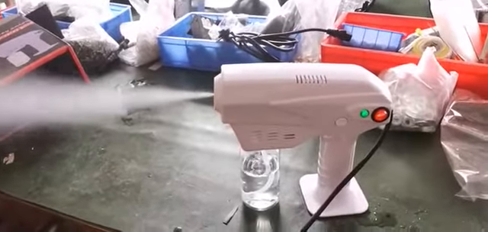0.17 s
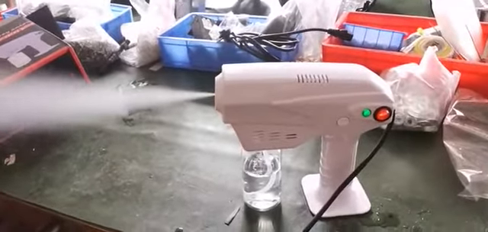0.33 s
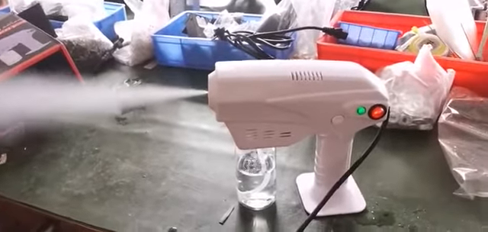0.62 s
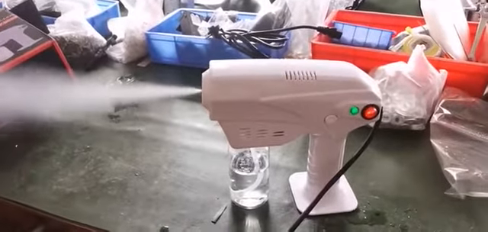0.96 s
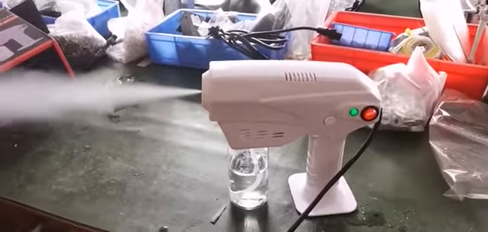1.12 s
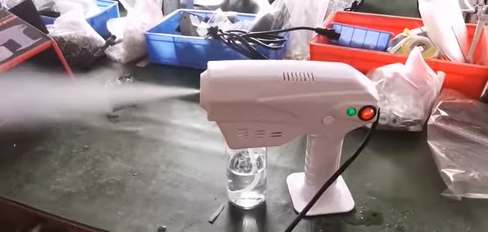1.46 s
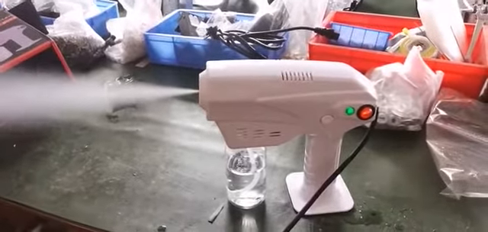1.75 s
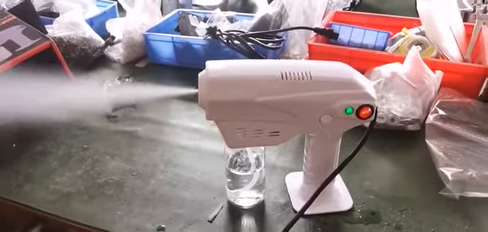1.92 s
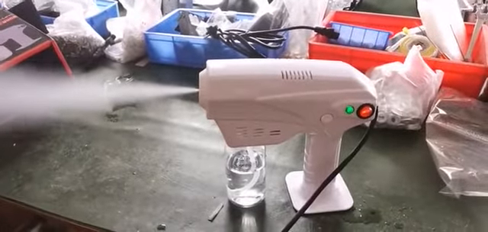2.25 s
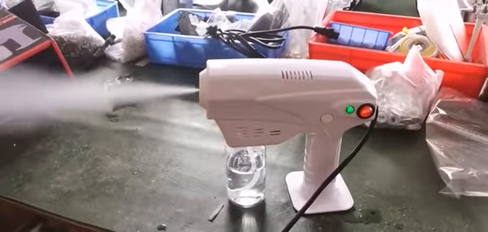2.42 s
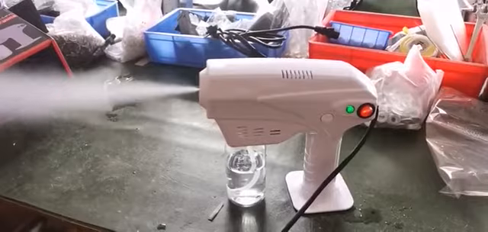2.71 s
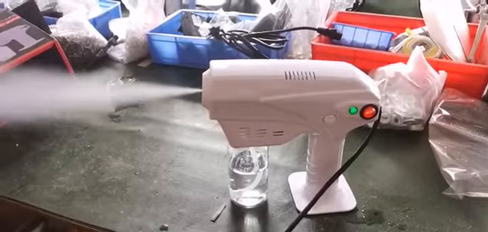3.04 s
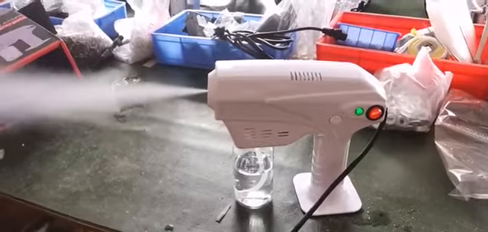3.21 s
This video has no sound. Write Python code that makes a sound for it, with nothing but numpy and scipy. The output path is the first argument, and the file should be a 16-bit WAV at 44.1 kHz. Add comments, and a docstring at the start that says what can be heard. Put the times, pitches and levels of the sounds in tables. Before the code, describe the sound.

A handheld fogger blows a continuous bright, airy hiss for about 3.4 seconds, fluttering rapidly with small spurts and spitting droplets, slightly hollow from close reflections. Behind it, a load drags across the floor around 0.2-0.7 and 0.75-1.4 seconds, scraping, faintly ringing like metal and rumbling. A small low bump comes near 2 seconds, then dull thuds from 2.6 to the end. Faint room hum; single microphone, dulled extreme top.

```python
"""A steam fogger on a work table blows a jet of mist: a bright, fluttering noise hiss with spurts and spat
droplets as water flashes in the nozzle, combed by close reflections off table and housing.
Behind it something is dragged twice across the shop floor: rubbing noise makes the scrape and excites
a thin metal ring, and resonant noise makes the rumble. Dull thuds of low noise follow, and the room
hums faintly as wavering dull noise. One microphone."""
import sys
import numpy as np
from scipy import signal
from scipy.fft import rfft, irfft
from scipy.io import wavfile
from scipy.ndimage import uniform_filter1d

SR = 44100
rng = np.random.default_rng(int(sys.argv[2]) if len(sys.argv) > 2 else 0)


def persist_wave(psi):
    """Save psi, clipped to +-1, as 16-bit WAV."""
    counts = np.round(np.clip(psi, -1, 1) * 32767).astype(np.int16)
    wavfile.write(sys.argv[1], SR, np.atleast_2d(counts).T)


def volts(x):
    """Linear amplitude factor 10**(x/20) for a level x in dB, scalar or array-like."""
    e = np.asarray(x, float) / 20
    return 10 ** e


N = 148617

# Tone colour of the steam jet: (frequency [Hz], relative density [dB per Hz])
JET_COLOUR = [(400, -41.5), (700, -19.5), (1100, -20), (1500, -18.5), (2100, -14), (2800, -9), (3500, -14),
              (4000, -12), (4250, -4.5), (4900, -2.5), (5600, 0.5), (6250, -1), (6900, -1.5), (7550, 0.5),
              (9000, -16)]
# Level of the jet's hiss, before flutter: (time [s], level [dB])
JET_LEVEL = [(0, -45), (.25, -44), (.55, -43.5), (.8, -45), (1.05, -43.5), (1.25, -44), (1.5, -44.5),
             (1.9, -44), (2.2, -44.5), (2.45, -44), (2.7, -44.5), (2.85, -45.5), (3.1, -44), (3.37, -44.5)]
# Strongest spurts of steam, before the spurt trim: (time [s], level [dB])
SPURTS = [(0.0575, -31.5), (0.1091, -32), (0.163, -32), (0.1894, -34.5), (0.2337, -30.5), (0.301, -38),
          (0.3683, -42.5), (0.4033, -45.5), (0.578, -31), (0.639, -31.5), (0.6737, -31.5), (0.8196, -33),
          (0.9517, -34), (1.0087, -31.5), (1.0765, -31), (1.143, -32.5), (1.187, -35), (1.209, -31),
          (1.266, -38.5), (1.3283, -47), (1.3714, -37), (1.3935, -32), (1.4626, -29.5), (1.5278, -31.5),
          (1.5766, -39), (1.6794, -32.5), (1.717, -27), (1.769, -33.5), (1.802, -42), (1.8532, -32.5),
          (1.8831, -34.5), (1.932, -30.5), (2.0026, -34.5), (2.033, -37.5), (2.0708, -31.5), (2.137, -32),
          (2.163, -36.5), (2.2065, -33), (2.2356, -34.5), (2.325, -41), (2.354, -31), (2.374, -31),
          (2.4348, -29), (2.5263, -32), (2.561, -36), (2.6782, -32.5), (2.7024, -30), (2.7442, -32),
          (2.824, -39), (2.915, -33), (2.9433, -32.5), (2.993, -28.5), (3.02, -28.5), (3.093, -33),
          (3.141, -28.5), (3.2129, -32), (3.292, -34.5), (3.326, -39.5)]
# Flutter of the hiss: (rate [per s], rms swing of the whole jet [dB], rms swing of each band alone [dB])
FLUTTER = [(27.87, 0.18, 0.61), (59.2, 0.5, 1.19), (140.5, 1.15, 0.5), (346.7, 0.52, .5)]
# Edges of the hiss bands that flutter separately: (frequency [Hz])
FLUTTER_BAND_EDGES = [0, 2400, 4200, 5200, 6400, 9000]
# Close reflections off table and housing: (delay [ms], level [dB])
REFLECTIONS = [(0.544, -15.5), (2.424, -16), (2.599, -15.5), (2.786, -17.5)]
# Level of the dragged load's scrape: (time [s], level [dB])
SCRAPE_LEVEL = [(.12, -95), (.2, -62.5), (.3, -52.5), (.48, -57), (.6, -51.5), (.74, -55.5), (.8, -59),
                (.95, -55.5), (1.1, -51.5), (1.25, -54.5), (1.36, -52.5), (1.43, -65), (1.55, -73)]
# Tone colour of the scrape: (frequency [Hz], relative density [dB per Hz])
SCRAPE_COLOUR = [(180, -17), (300, -11), (374, -5), (734, -9.5), (1130, -5.5), (1640, -5.5), (2070, -4),
                 (2850, -9.5), (4200, -6), (5460, -41.5), (9240, -120)]
# Level of the metal ring: (time [s], level [dB])
METAL_LEVEL = [(.15, -66), (.2, -62), (.3, -51), (.46, -51.5), (.6, -68.5), (.76, -56.5), (.82, -70),
               (1.03, -65), (1.16, -53.5), (1.27, -51), (1.36, -57), (1.44, -59), (1.55, -71.5)]
# Resonances of the load's metal parts: (frequency [Hz], width [Hz], relative level before flicker [dB])
METAL_MODES = [(1308, 56, -22.5), (1519, 21, -26.5), (2030, 25, -16), (2135, 25, -15.5), (2254, 55, -18),
               (2350, 900, -9)]
# Level of the drag's rumble through the floor: (time [s], level [dB])
RUMBLE_LEVEL = [(0, -82), (.07, -67), (.17, -64), (.22, -58), (.36, -56), (.44, -62), (.52, -56),
                (.58, -53), (.65, -58), (.68, -67), (.72, -57), (.77, -63), (.82, -62.5), (.88, -67.5),
                (1.0, -62.5), (1.07, -64.5), (1.15, -57.5), (1.24, -56), (1.3, -61), (1.35, -48.5),
                (1.39, -55), (1.47, -67.5), (1.56, -86), (1.8, -72.5), (1.93, -76), (2.02, -55.5),
                (2.07, -63), (2.13, -77), (2.3, -85)]
# Floor resonances: (frequency [Hz], width of the first of two passes [Hz], relative level [dB])
FLOOR_MODES = [(107.4, 20, 3), (144, 31, -7), (245, 41, -14), (373, 39, -13), (576, 58, -17)]
# Level of the dull thuds and shuffling, before random swings: (time [s], level [dB])
THUD_LEVEL = [(2.55, -68), (2.69, -58), (2.77, -56), (2.83, -74.5), (2.93, -60), (3.0, -58.5), (3.1, -73),
              (3.18, -62), (3.24, -59.5), (3.31, -54), (3.36, -52)]
# Tone colour of the thuds: (frequency [Hz], relative density [dB per Hz])
THUD_COLOUR = [(35, -32), (90, -9), (243, -2.5), (304, -3.5), (348, 1.5), (536, -12.5), (594, -22),
               (700, -16.5), (910, -32), (1540, -120)]
# Level of the room hum, before wavering: (time [s], level [dB])
ROOM_LEVEL = [(0, -64), (.18, -64.5), (.3, -64), (1.45, -65), (1.7, -63.5), (2.45, -63.5), (3.37, -62)]
# Tone colour of the room: (frequency [Hz], relative density [dB per Hz])
ROOM_COLOUR = [(12, -50), (20, -4.5), (48, -3), (75, -3), (149, -2.5), (317, -6), (360, -5.5), (576, -7),
               (1500, -9.5), (1950, -28.5), (3300, -120)]


def frequencies():
    """Frequency of every spectrum bin, in Hz."""
    return np.arange(N // 2 + 1) * SR / N


def curve(table):
    """Level over time in dB, 20 dB lower before the table starts and after an early end."""
    times, levels = np.array(table, float).T
    ends_early = times[-1] < N / SR - 0.1
    after = levels[-1] - 20 * ends_early
    return np.interp(np.arange(N) / SR, times, levels, left=levels[0] - 20, right=after)


def unit(x):
    """Scales a sound to rms 1."""
    return x / np.sqrt(np.mean(x ** 2))


def noise():
    """White noise."""
    return rng.standard_normal(N)


def colour(x, points):
    """Filters x by (Hz, dB) points joined on a log frequency axis, to rms 1."""
    hz, db = np.array(points, float).T
    f = frequencies() + 0.0005  # keeps the logarithm finite at 0 Hz
    gain = volts(np.interp(np.log(f), np.log(hz), db))
    return unit(irfft(rfft(x) * gain, N))


def band(x, lo_hz, hi_hz):
    """The part of x between two frequencies."""
    f = frequencies()
    return irfft(rfft(x) * (f >= lo_hz) * (f < hi_hz), N)


def resonate(x, hz, width_hz):
    """One resonance excited by x, to rms 1."""
    b, a = signal.iirpeak(hz, hz / width_hz, SR)
    return unit(signal.lfilter(b, a, x))


def walk(rate):
    """Random levels drawn rate times a second and smoothed twice, to rms 1."""
    k = int(SR / rate)
    steps = np.repeat(rng.standard_normal(N // k + 1), k)
    smooth = uniform_filter1d(uniform_filter1d(steps, k), k)
    return unit(smooth[:N])


def even(x, s):
    """Takes out level swings slower than about s seconds."""
    k = int(s * SR)
    power = uniform_filter1d(uniform_filter1d(x ** 2, k), k)
    return x / np.sqrt(power + 1e-3)


def hiss():
    """Turbulent steam: coloured noise that flutters band by band and as a whole."""
    air = colour(noise(), JET_COLOUR)
    total = np.zeros(N)
    for lo, hi in zip(FLUTTER_BAND_EDGES, FLUTTER_BAND_EDGES[1:]):
        band_flutter = sum(db * walk(rate) for rate, _, db in FLUTTER)
        total += band(air, lo, hi) * volts(band_flutter)
    jet_flutter = sum(db * walk(rate) for rate, db, _ in FLUTTER)
    return total * volts(jet_flutter)


def spits():
    """Spat droplets: random impulses of uneven strength, each a decaying noise tick, to rms 1."""
    rate_per_s, spread_db, decay_s = 600, 1, 0.0007
    strength = volts(spread_db * np.minimum(rng.exponential(size=N), 3.5))
    drops = (rng.random(N) < rate_per_s / SR) * strength
    tail = np.exp(-np.arange(400) / SR / decay_s)
    ticks = np.convolve(drops, tail)[:N] * noise()
    return colour(ticks, JET_COLOUR)


def spurts():
    """Water flashing to steam: resonant noise in brief swells that rise faster than they fall."""
    rise_s, fall_s, trim_db = 0.0037, 0.0076, -11.5
    t = np.arange(N) / SR
    swell = np.zeros(N)
    for start, db in SPURTS:
        u = t - start - rise_s  # time from the peak
        slope_s = np.where(u < 0, rise_s, fall_s)
        swell += volts(db + trim_db) * np.exp(-(u / slope_s) ** 2)
    steam = resonate(colour(noise(), JET_COLOUR), 5300, 2000)  # Hz, width in Hz
    return even(steam, 0.003) * swell


def reflect(x):
    """Delayed copies off table and housing comb the spectrum; mean power gain is 1."""
    f = frequencies()
    comb = 1 + sum(volts(db) * np.exp(-2j * np.pi * f * ms / 1000) for ms, db in REFLECTIONS)
    return irfft(rfft(x) * comb, N) / np.sqrt(np.mean(abs(comb) ** 2))


def jet():
    """The steam jet: hiss and spits share one level curve, spurts join, reflections comb them all."""
    spit_db = -7.5
    steady = volts(curve(JET_LEVEL)) * (hiss() + volts(spit_db) * spits())
    return reflect(steady + spurts())


def scrape(rub):
    """Coloured rubbing noise, following the drag."""
    return volts(curve(SCRAPE_LEVEL)) * even(colour(rub, SCRAPE_COLOUR), 0.09)


def metal_ring(rub):
    """Rubbing shakes the load's metal parts, whose resonances flicker separately."""
    flicker_db = 4.0
    modes = sum(volts(db + flicker_db * walk(16)) * resonate(rub, hz, width)
                for hz, width, db in METAL_MODES)
    return volts(curve(METAL_LEVEL)) * even(unit(modes), 0.084)


def floor_rumble():
    """The floor booms: noise passed twice through each low resonance."""
    modes = np.zeros(N)
    for hz, width, db in FLOOR_MODES:
        narrow = resonate(noise(), hz, width)
        modes += volts(db) * resonate(narrow, hz, 2 * width)
    return volts(curve(RUMBLE_LEVEL)) * even(unit(modes), 0.046)


def drag():
    """A load dragged on the floor: one fitful rubbing noise feeds scrape and ring, the floor booms."""
    rub = noise() * volts(0.79 * walk(25) + 1.0 * walk(60))
    return scrape(rub) + metal_ring(rub) + floor_rumble()


def thuds():
    """Low knocking noise in lumps, with random level swings."""
    swing_db = 2.5
    knock = even(colour(noise(), THUD_COLOUR), 0.032)
    return volts(curve(THUD_LEVEL) + swing_db * walk(30)) * knock


def room():
    """Dull background noise whose bass, middle and top waver separately."""
    sway_db, flicker_db = 0.4, 1.4
    air = colour(noise(), ROOM_COLOUR)
    total = np.zeros(N)
    for lo, hi in [(0, 180), (180, 600), (600, 4800)]:  # Hz
        part = band(air, lo, hi)
        steady = even(unit(part), 0.16) * np.std(part)
        total += volts(sway_db * walk(4.9) + flicker_db * walk(16)) * steady
    return volts(curve(ROOM_LEVEL)) * total


def scene():
    """All sources at one microphone, copied to both channels."""
    return np.tile(jet() + drag() + thuds() + room(), (2, 1))


def top_cut(x):
    """Nothing passes above the cut-off."""
    return signal.sosfilt(signal.butter(12, 8730, fs=SR, output="sos"), x)


def record(dry):
    """The top of the mix is cut on a steep slope."""
    corner_hz, slope_db_per_hz = 7575, 0.42
    cut_db = -slope_db_per_hz * np.maximum(frequencies() - corner_hz, 0)
    mix = irfft(rfft(dry) * volts(cut_db), N)
    return top_cut(mix)


dry = scene()
out = record(dry)
persist_wave(out)
```